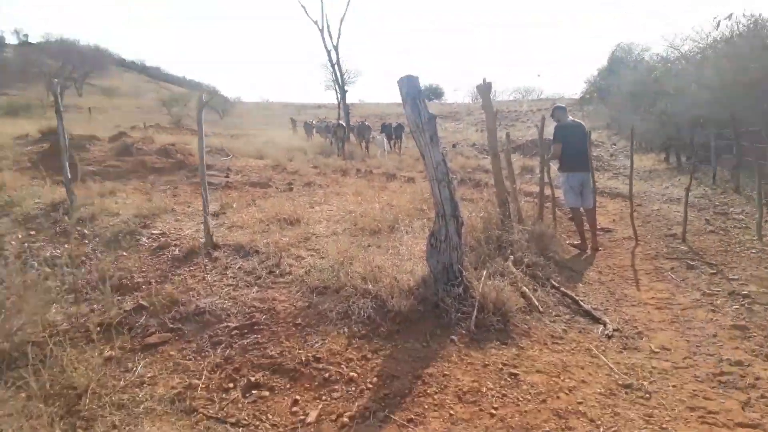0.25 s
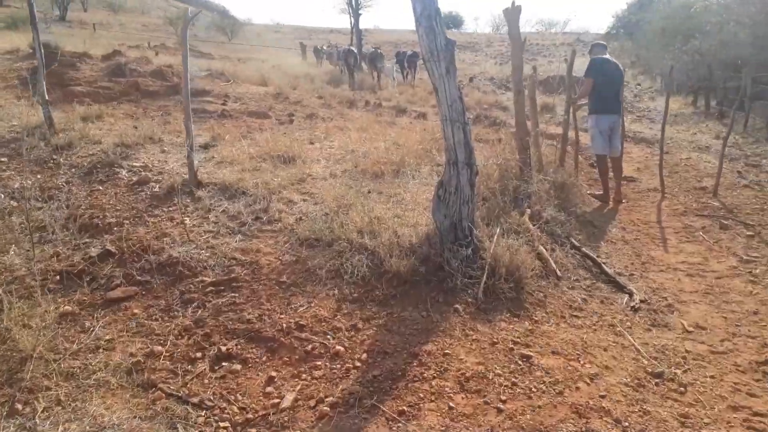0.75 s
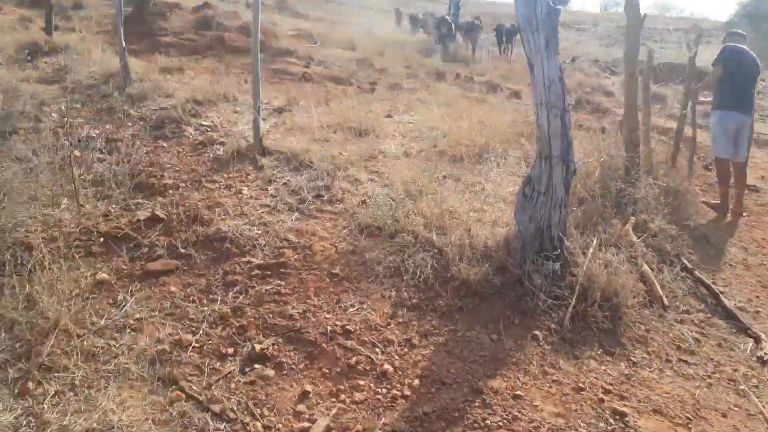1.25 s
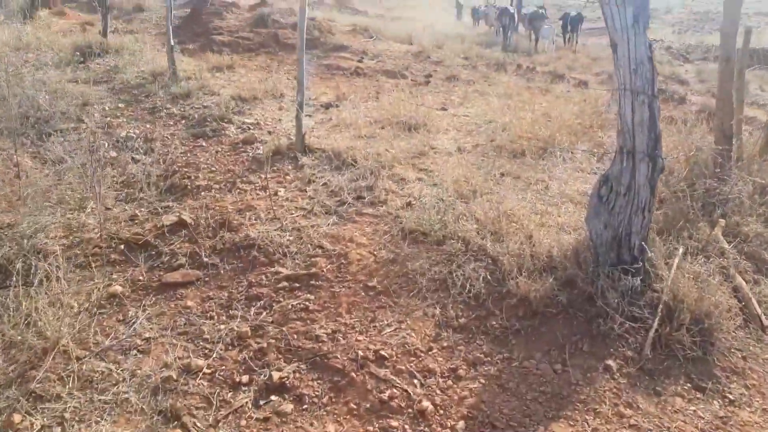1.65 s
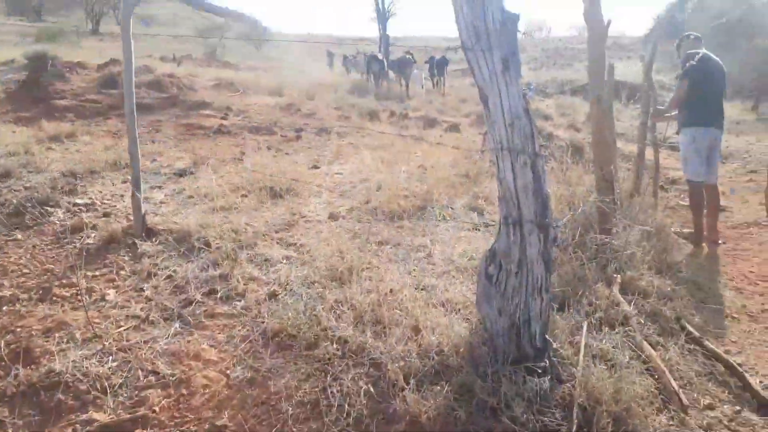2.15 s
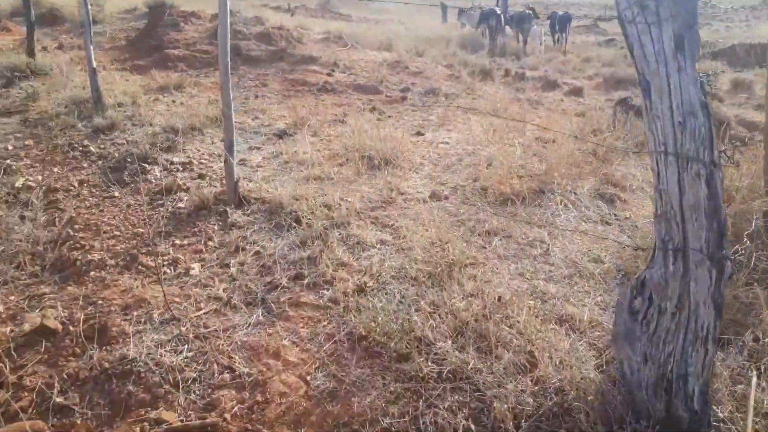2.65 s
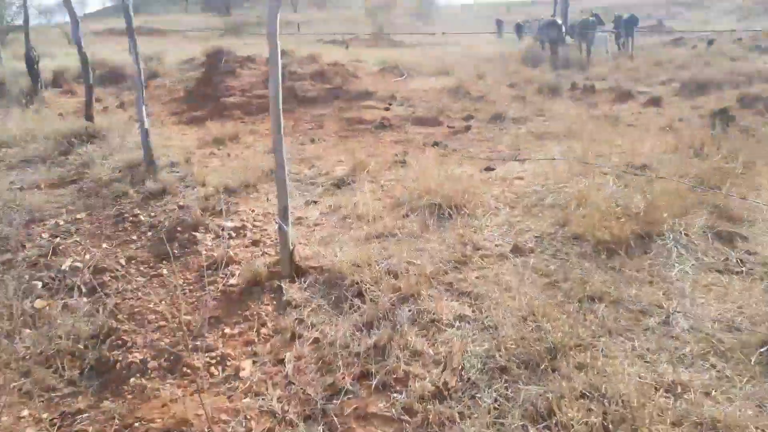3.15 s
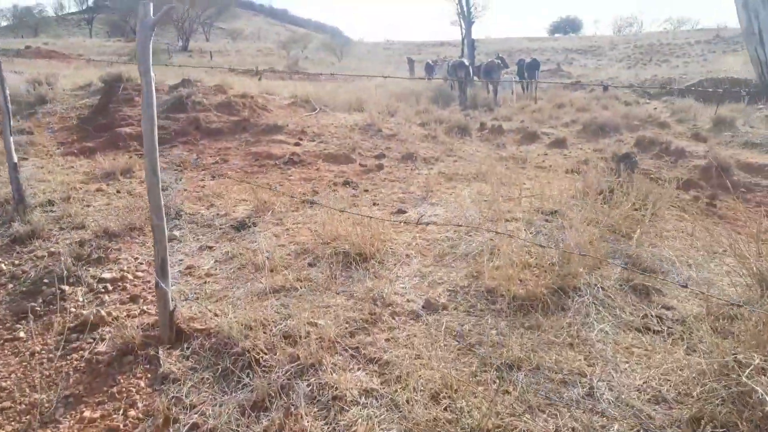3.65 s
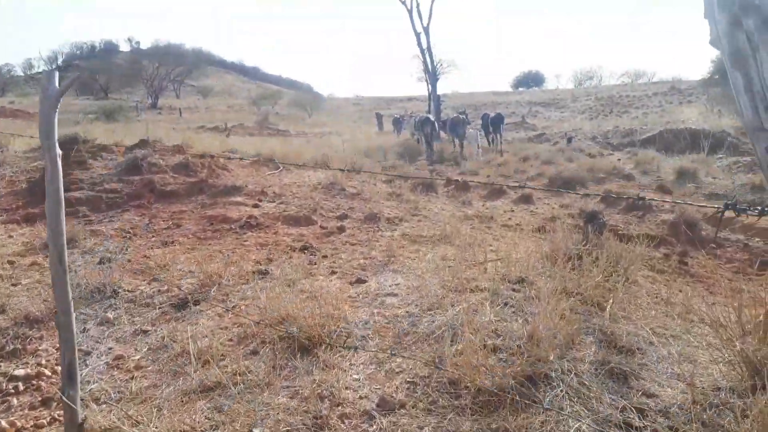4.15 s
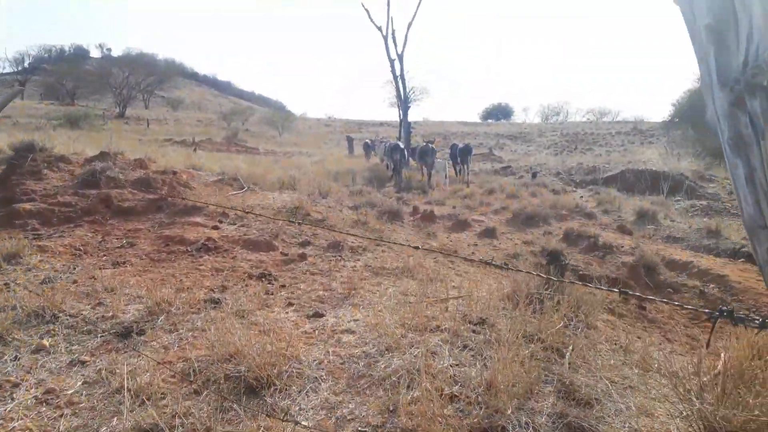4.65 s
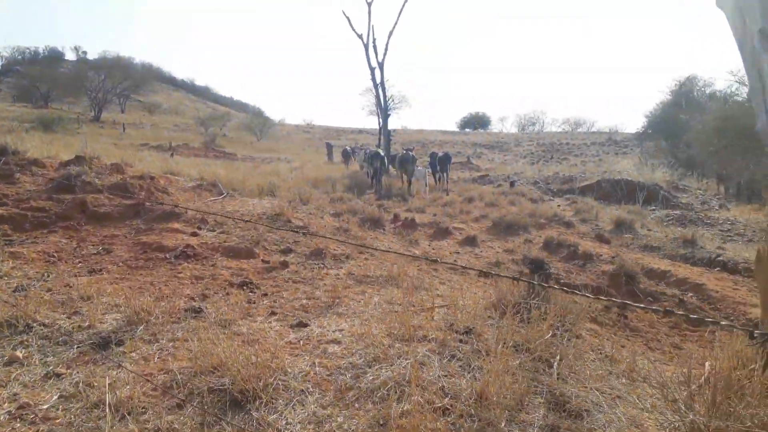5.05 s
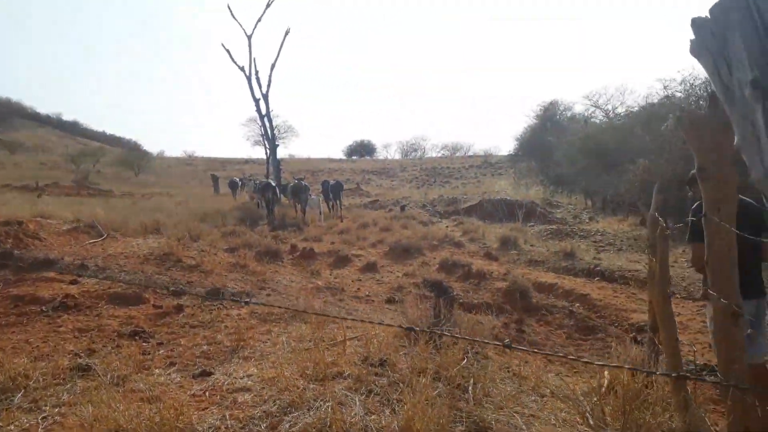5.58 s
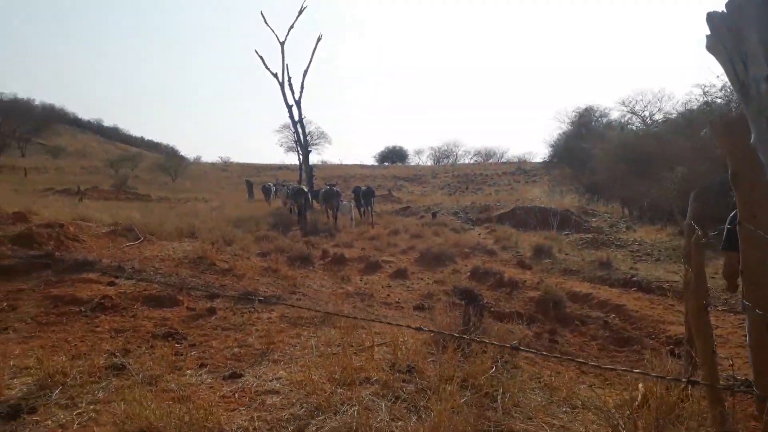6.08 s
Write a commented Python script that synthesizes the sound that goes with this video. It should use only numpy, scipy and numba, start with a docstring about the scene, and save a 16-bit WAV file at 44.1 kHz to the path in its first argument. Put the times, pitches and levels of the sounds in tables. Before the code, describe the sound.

The scene is open, dry pasture with still air and hardly any echo. At about 0.3 seconds a nearby cow briefly draws air, along with a swish of grass and a sharp snap. Stalks crackle, steps grind grit, and small stones knock between roughly 1.5 and 2.2 seconds. At 1.6 seconds the cow starts one long moo as a low pulsing hum. It breaks into a growl around 2.5 seconds, then rises to a hoarse, rattling bellow, loudest near 3.5 seconds. It sinks to a grumble after 4.3 seconds and ends by 4.9. A small bird chirps faintly at about 1.5 and 4.7 seconds. Soft low bumps shake the hand-held microphone, mostly in the first three seconds and again near the end. Faint rustles and ticks continue until about 6.4 seconds.

```python
"""A cow close by draws air and gives one long moo: a pulsing hum that breaks into a growl, swells to a
hoarse open-mouthed bellow and sinks to a grumble. Its vocal folds ring the throat and the changing mouth.
Dry pasture grass rustles and snaps, grit and stones grind and knock underfoot, a small bird chirps twice
and soft bumps shake the hand-held microphone. Open ground, hardly any echo."""
import sys
import numpy as np
from scipy import signal
from scipy.fft import rfft, irfft
from scipy.io import wavfile
from scipy.ndimage import uniform_filter1d
from numba import njit

SR = 44100
rng = np.random.default_rng(int(sys.argv[2]) if len(sys.argv) > 2 else 0)


def persist_wave(psi):
    """Save psi, clipped to +-1, as 16-bit WAV."""
    counts = np.round(np.clip(psi, -1, 1) * 32767).astype(np.int16)
    wavfile.write(sys.argv[1], SR, np.atleast_2d(counts).T)


N = 278712
TIME = np.arange(N) / SR
BINS_HZ = np.maximum(np.fft.rfftfreq(8192, 1 / SR), 1)

# Spectrum of dry straw. Each row: frequency in Hz, gain in dB.
STRAW = [(300,14),(1000,5.5),(2500,8.5),(4000,7),(6000,5),(7500,1.5),(9300,5),(10700,-8),(15500,-2.5)]
# Stalks and clods breaking. Each row: start in seconds, crack peak in dB, body peak in dB.
SNAPS = [(0.1982,-35.5,-35),(0.3211,-25,-29.5),(0.517,-36.5,-50.5),(0.5927,-37.5,-43),(0.714,-39,-58),(0.881,-37,-34),(0.9966,-37,-41),(1.075,-50,-42),
         (1.1974,-35,-56),(1.2347,-32,-60),(1.356,-47,-46),(1.508,-44,-48),(1.5612,-26,-24.5),(1.955,-39,-35),(1.971,-45,-36),(2.1826,-52,-51),(2.7791,-40,-22.5),(2.872,-37.5,-49),(3.165,-35,-43),
         (3.226,-34.5,-35),(3.618,-31.5,-52),(4.2816,-33.5,-55),(4.964,-44,-43.5),(5.149,-35.5,-66),(5.264,-75,-43.5),(5.338,-42,-51),
         (5.421,-41,-67),(5.5217,-46,-54),(5.557,-42,-42),(5.6257,-51,-50),(5.7448,-39.5,-61),(5.7818,-32.5,-48),(6.16,-41.5,-47),(6.283,-43,-36)]


def undb(db):
    """Decibels to gain."""
    return 10 ** (np.asarray(db) / 20)


def curve(rows):
    """Linear interpolation of (seconds, value) rows over TIME."""
    return np.interp(TIME, *np.transpose(rows))


def swell(rows, fade_s=0.011):
    """Gain from (seconds, dB) rows, faded to zero outside their span."""
    inside_s = np.minimum(TIME - rows[0][0], rows[-1][0] - TIME)
    return undb(curve(rows)) * np.clip(1 + inside_s / fade_s, 0, 1)


def unit(x):
    """Scale to rms 1."""
    return x / np.sqrt(np.mean(x ** 2))


def at_peak(x, db):
    """Scale to a peak level."""
    return undb(db) * x / np.abs(x).max()


def steady(x, size=4000):
    """Hold the running rms at 1, keeping the fast flutter."""
    power = uniform_filter1d(uniform_filter1d(x ** 2, size), size)
    return x / np.sqrt(np.abs(power) + 1e-14)


def shape(x, gain):
    """Minimum-phase filter with the given gain on BINS_HZ."""
    cepstrum = irfft(np.log(gain + 1e-6))
    half = len(cepstrum) // 2
    cepstrum[1:half] *= 2
    cepstrum[half + 1:] = 0
    impulse = irfft(np.exp(rfft(cepstrum)))[:half]
    return signal.fftconvolve(x, impulse)[:len(x)]


def colour(x, points):
    """Filter by a spectrum of (Hz, dB) points."""
    hz, db = np.transpose(points)
    return shape(x, undb(np.interp(np.log(BINS_HZ), np.log(hz), db)))


def resonate(x, modes):
    """Filter by steep-sided resonances (centre Hz, width Hz, dB)."""
    power = sum((undb(db) / (1 + (2 * (BINS_HZ - hz) / width) ** 2)) ** 2 for hz, width, db in modes)
    return shape(x, np.sqrt(power))


@njit
def band(x, hz, width_hz):
    """State-variable band-pass with a moving centre."""
    y, band_state, low_state = np.empty(len(x)), 0., 0.
    for i in range(len(x)):
        g, damping = np.tan(np.pi * hz[i] / SR), width_hz / hz[i]
        v = (band_state + g * (x[i] - low_state)) / (1 + g * (g + damping))
        band_state, low_state = 2 * v - band_state, low_state + 2 * g * v
        y[i] = damping * v
    return y


def add(out, start_s, sound):
    """Mix a sound in at start_s."""
    start = max(int(start_s * SR), 0)
    out[start:start + len(sound)] += sound[:max(N - start, 0)]


def grains(per_s, spread_db=2):
    """Sparse clicks, most small and a few large."""
    size = undb(spread_db * np.minimum(rng.exponential(size=N), 4))
    return (rng.random(N) < per_s / SR) * size * rng.standard_normal(N)


def walk(size):
    """Smooth random drift within -1 to 1, changing about every size samples."""
    drift = uniform_filter1d(uniform_filter1d(rng.standard_normal(N), size), size // 2)
    return np.tanh(unit(drift))


def burst(t60_s, size=4096):
    """Exponentially decaying noise."""
    return rng.standard_normal(size) * np.exp(-np.log(1000) * TIME[:size] / t60_s)


def open_air(level_db=-65.5):
    """Faint steady noise of still air."""
    # Each row: frequency in Hz, gain in dB.
    spectrum = [(40,-4),(100,-5),(200,-5),(400,-9.5),(600,-3),(1000,-7.5),(1600,-4),(3000,-15.5),(6000,-21),(9000,-18),(11000,-23),(15500,-18)]
    return undb(level_db) * unit(colour(rng.standard_normal(N), spectrum))


def inhale(top_db=-44.5, release_s=0.31, rise_db_per_s=18, fall_db_per_s=120):
    """Air rushes in through the nostrils, growing a little before it stops."""
    # Each row: resonance in Hz, width in Hz, gain in dB.
    nostrils = [(545,280,3.5),(1080,510,-0.5),(1570,300,10),(2150,660,6),(2830,430,-1),(3950,1300,-3),(6100,2500,-13.5)]
    since_s = TIME - release_s
    db = top_db + np.minimum(rise_db_per_s * since_s, -fall_db_per_s * since_s)
    return undb(db) * unit(resonate(rng.standard_normal(N), nostrils))


def grass(rustle_db=-59.5, settle_db_per_s=2, flick_db=-4, fade_s=0.0043):
    """Dry blades slide in tufts and flick free: a settling rustle, and a swish for each stroke."""
    # Each row: start in seconds, length in seconds, end level in dB, rise in dB, fine-blade share 0-1.
    swishes = [(0.238,0.069,-35.5,18,0.57),(0.718,0.047,-53,-1,0.93),(0.781,0.15,-53,9,0.2),(1.005,0.046,-43.5,13.5,0.9),(1.123,0.13,-55,-5.5,0.67),(1.272,.1,-49.5,4,0.57),(1.393,0.22,-53.5,6,0),(2.032,0.034,-52,0,0),
               (2.184,0.045,-51.5,-12,0),(3.594,0.27,-63.5,-10,0.2),(4.196,0.5,-65,10,0.44),(4.71,0.39,-64.5,3,0.55),(5.502,0.03,-68,-8,0.4),(5.423,0.019,-64,7,1),(5.782,0.021,-56.5,-3,0.64),(5.907,0.083,-68,-4,0.6),(6.08,0.19,-71.5,0,0.3)]
    # Each row: frequency in Hz, gain in dB.
    fine_straw = [(300,-11),(2000,-0.5),(4500,1),(7000,7),(9300,9.5),(10700,3.5),(15500,-9.5)]
    tufts = undb(4 * walk(200) + 4 * walk(900))
    sliding = steady(tufts * grains(per_s=7000), size=3000)
    flicks = unit(np.tanh(grains(per_s=120)))
    blades = sliding + undb(flick_db) * flicks
    coarse, fine = undb(rustle_db - settle_db_per_s * TIME), 0
    for start_s, length_s, end_db, rise_db, fine_share in swishes:
        progress = np.clip((TIME - start_s) / length_s, 0, 1)
        outside_s = np.abs(TIME - start_s - progress * length_s)
        stroke = undb(end_db + rise_db * (progress - 1)) * np.exp(-outside_s / fade_s)
        coarse += (1 - fine_share) * stroke
        fine += fine_share * stroke
    return coarse * unit(colour(blades, STRAW)) + fine * unit(colour(blades, fine_straw))


def crackle(count=130, min_db=-50, range_db=10, low_hz=1400, high_hz=17000, mean_t60_s=0.027):
    """Small stalks tick and soil crumbs drop at random, each with its own pitch and length."""
    out = np.zeros(N)
    for when, pitch, strength, length in rng.random((count, 4)):
        hz = low_hz * (high_hz / low_hz) ** pitch
        tick = resonate(burst(mean_t60_s * (.5 + length), size=2048), [(hz, 0.89 * hz, 0)])
        add(out, when * N / SR, at_peak(tick, min_db + range_db * strength))
    return out


def snaps(crack_t60_s=0.022, body_t60_s=0.037, click=1.22):
    """Each break is a click and a bright crack over a duller, quickly damped body."""
    # Each row: frequency in Hz, gain in dB.
    crack_spectrum = [(1500,-22),(4000,-1.5),(8500,8),(11000,-1),(15000,4.5)]
    body_spectrum = [(200,-1),(600,-2),(1350,-2),(2600,-3),(5000,-17.5),(10000,-36)]
    out = np.zeros(N)
    for start_s, crack_db, body_db in SNAPS:
        crack, body = burst(crack_t60_s), burst(body_t60_s)
        crack[0] = body[0] = click
        add(out, start_s, at_peak(colour(crack, crack_spectrum), crack_db))
        add(out, start_s, at_peak(colour(body, body_spectrum), body_db))
    return out


def snap_haze(relative_db=-37, spread_s=0.043):
    """A faint grainy haze of noise around each snap."""
    impulses = np.zeros(N)
    for start_s, crack_db, _ in SNAPS:
        add(impulses, start_s, undb([crack_db + relative_db]))
    window = np.exp(-np.abs(np.arange(-4096, 4097)) / (spread_s * SR))
    haze = np.tanh(grains(per_s=1100, spread_db=6))
    return signal.fftconvolve(impulses, window, "same") * unit(colour(haze, STRAW))


def bumps(rise_s=0.0077, sag_per_s=30):
    """A bump sways the microphone for a few low cycles that sink in pitch."""
    # Each row: start in seconds, peak in dB, pitch at the peak in Hz.
    jolts = [(0.357,-37,211),(0.373,-30.5,148),(0.39,-33,111),(0.419,-32.5,125),(0.76,-43.5,89),(0.908,-37.5,96),(1.121,-39,97),(1.151,-38.5,100),(1.206,-35,111),
             (1.288,-42.5,84),(1.315,-41.5,94),(2.044,-38,97),(2.075,-37.5,111),(2.785,-37,119.1),(2.84,-35.5,96),(6.141,-41,83.4),(6.281,-46.5,263),(6.285,-40,106)]
    out, t = np.zeros(N), TIME[:4096]
    envelope = (t / rise_s * np.exp(1 - t / rise_s)) ** 2
    for start_s, peak_db, hz in jolts:
        phase = 2 * np.pi * np.cumsum(hz * np.exp(-sag_per_s * (t - rise_s))) / SR
        add(out, start_s, undb(peak_db) * envelope * np.sin(phase))
    return out


def steps(attack_s=0.00018, straw_db=-12):
    """Hooves and feet grind grit and crush a little straw."""
    # Each row: start in seconds, level in dB, decay time constant in seconds.
    footfalls = [(0.794,-49.5,0.017),(0.876,-45,0.091),(0.965,-51.5,0.021),(1.552,-41,0.028),(1.607,-37,0.025),(2.207,-38,0.046),(2.768,-39,0.025),(3.607,-33.5,0.0059),
                 (4.82,-44,0.024),(5.038,-48,0.04),(5.891,-53.5,0.038),(5.953,-56,0.025)]
    # Each row: frequency in Hz, gain in dB.
    grit = [(80,9),(200,3),(500,9),(900,11),(1500,9.5),(2500,4.5),(4000,1.5),(8000,-13.5)]
    weight = np.zeros(N)
    for start_s, db, decay_s in footfalls:
        add(weight, start_s, undb(db) * np.minimum(TIME / attack_s, 1) * np.exp(-TIME / decay_s))
    soil = steady(colour(grains(per_s=3000), grit))
    straw = steady(colour(grains(per_s=3000), STRAW))
    return weight * (soil + undb(straw_db) * straw)


def knocks(width_hz=250, t60_s=0.029):
    """A loose stone scuffs another underfoot and rings briefly."""
    # Each row: start in seconds, peak in dB, resonance in Hz.
    stones = [(0.796,-51,1740),(1.073,-45.5,2170),(1.441,-48,900),(1.613,-31.5,1150),(1.836,-31,1290),(1.892,-32,1370),(1.955,-50,1140),(2.214,-30.5,1210),(2.231,-35,2620),(5.891,-47.5,2370),(5.957,-45,1440)]
    out = np.zeros(N)
    for start_s, peak_db, hz in stones:
        ring = resonate(burst(t60_s), [(hz, width_hz, 0)])
        add(out, start_s, at_peak(ring, peak_db))
    return out


def bird(arch=0.48, crest=0.76, warble=0.073):
    """Short reedy notes that arch up in pitch."""
    # Each row: start in seconds, length in seconds, top pitch in Hz, level in dB.
    chirps = [(1.466,0.0253,1740,-50),(4.698,0.048,2237,-51)]
    # Each row: harmonic number, gain in dB.
    partials = [(1,-27),(2,3.5),(3,-13),(4,-47),(5,-15)]
    out = np.zeros(N)
    for start_s, length_s, top_hz, db in chirps:
        progress = np.linspace(0, 1, int(length_s * SR))
        flutter = unit(uniform_filter1d(rng.standard_normal(N), size=12))[:len(progress)]
        hz = top_hz * (1 - arch * (progress - crest) ** 2) * (1 + warble * flutter)
        phase = 2 * np.pi * np.cumsum(hz) / SR
        note = sum(undb(gain_db) * np.sin(k * phase) for k, gain_db in partials)
        add(out, start_s, undb(db) * np.sin(np.pi * progress) * note)
    return out


def folds(roughness, jitter=.2, shimmer=5, rasp=6.3):
    """Vocal folds close in even clicks; a hoarse version slaps unevenly and chops turbulent air."""
    # Each row: time in seconds, pitch in Hz.
    pitch = [(1.63,74.8),(1.83,78.67),(2.04,85.9),(2.16,85.2),(2.29,83.16),(2.42,76.23),(2.55,66),(3.05,73.97),(3.25,90.29),(3.65,90.02),(3.87,87.26),(4.15,78.73),(4.27,74.35),(4.45,72.56),(4.88,62.82)]
    hz = curve(pitch)
    cycles = np.cumsum(hz) / SR
    closures = np.searchsorted(cycles, np.arange(1, int(cycles[-1])))
    late, strength = rng.standard_normal((len(closures), 2)).T * roughness[closures]
    jittered = np.clip(closures + jitter * late * SR / hz[closures], 0, N - 1).astype(int)
    even, uneven = np.zeros((2, N))
    even[closures] = 1
    uneven[jittered] = undb(shimmer * strength)
    puffs = signal.lfilter([1], [1, -np.exp(-np.median(hz) / SR)], uneven)  # decay: about one period
    turbulence = steady(puffs * rng.standard_normal(N))
    overtone_tilt = [(100, -4), (260, -4), (600, -2), (1200, 0), (3500, 0)]
    return steady(even), colour(steady(uneven) + rasp * turbulence, overtone_tilt)


def throat(flow, roughness, width_hz=78, chest_db=1.2):
    """The flow rings a deep throat resonance; the chest hums along most while the folds swing evenly."""
    # Each row: time in seconds, resonance in Hz.
    resonance = [(1.62,327),(1.67,318),(1.73,184),(2.2,247),(2.65,246),(3.4,260.5),(4.25,253.2),(4.45,204),(4.6,200),(4.85,190)]
    hz = curve(resonance)
    ring = steady(band(band(flow, hz, width_hz), hz, width_hz))
    chest_modes = [(89.4, 26, -12.5), (160.4, 46, -0.5), (398, 92, -15.5)]
    chest = (1 - roughness) ** 3 * steady(resonate(flow, chest_modes))
    nasal_notch = [(110, -2), (180, 1.5), (290, 1), (355, -11), (420, -5), (600, -6)]
    return steady(colour(ring + undb(chest_db) * chest, nasal_notch), size=2000)


def jaw_glide(x, modes):
    """Resonances slide together with the jaw, by filtering on a warped clock."""
    # Each row: time in seconds, frequency ratio.
    jaw = [(1.65,1.0),(2.3,1.0),(2.5,.985),(2.75,1.0),(3.05,1.015),(3.4,1.005),(3.8,.99),(4.08,1.025),(4.3,.965),(4.5,1.0),(4.85,.97)]
    clock = np.cumsum(curve(jaw))
    ticks = np.arange(int(clock[-1]))
    warped = np.interp(ticks, clock, x)
    return np.interp(clock, ticks, resonate(warped, modes))


def mouth(source, shares, wheeze_db=-28.5, drift_db=3.6, breath=.7):
    """The folds ring one mouth shape per stage; folds and breath ring the airway's top resonances."""
    # Each row: resonance in Hz, width in Hz, gain in dB.
    nasal = [(660,220,-4.5),(830,150,-6.5),(1040,170,.5),(1440,150,4),(1920,210,2),(2300,220,-9),(2560,140,-10),(2790,130,-8),(3450,150,-8),(3750,260,-12),(4220,200,-10),(7550,350,-22)]
    hum = [(470,100,-3),(620,150,1),(860,105,5.5),(1110,170,1),(1430,200,-2),(1860,270,2),(2270,200,-1.5),(2660,380,-12),(3600,520,-8.5),(4250,480,-15),(6400,1200,-24)]
    sinking = [(540,190,4),(865,170,7.5),(1140,250,-5),(1460,320,-2.5),(1900,260,-2),(2170,240,-1.5),(2570,500,-14.5),(3750,800,-17),(4450,250,-15)]
    growl = [(520,220,8),(730,170,16),(1040,160,8.5),(1270,140,11.5),(1480,200,9.5),(1880,360,6),(2400,900,-5.5),(4100,2400,-7.5)]
    bellow = [(620,170,2),(985,140,-.5),(1110,160,-6),(1540,110,1.5),(1800,140,-5.5),(2010,200,-10),(2270,120,-7.5),(2730,240,-20),(3700,1600,-32)]
    closing = [(420,80,-1),(595,150,11),(900,130,-1.5),(1110,190,-2),(1450,260,-12),(1850,250,-1.5),(2290,200,-17.5),(2800,420,-22)]
    grumble = [(563,216,5),(850,93,0.5),(1160,490,-5),(1540,430,-4),(1800,270,-5.5),(2210,170,-2.5),(2670,720,-13),(4500,4400,-25)]
    airway = [(3400,200,-3),(3900,200,0),(4450,420,1),(5900,420,-3),(6450,300,-3),(7100,300,-2),(7700,450,-7)]
    shapes = [nasal, hum, sinking, growl, bellow, closing, grumble]
    voice = sum(share * steady(jaw_glide(source, modes)) for share, modes in zip(shares, shapes))
    wheeze_gain = undb(wheeze_db + drift_db * walk(2500))
    wheeze = steady(jaw_glide(source + breath * rng.standard_normal(N), airway))
    return voice + wheeze_gain * wheeze


def moo(voiced_hz=790):
    """The lungs drive the folds through throat and mouth, each stage gliding into the next."""
    # One stage per mouth shape. Each row: entry in seconds, glide in seconds,
    # mouth roughness 0-1, throat roughness 0-1.
    stages = [(1.6,.1,.08,.05),(1.85,.16,.11,.05),(2.26,.16,.16,.07),(2.47,.16,.45,.33),(2.99,.36,.44,.3),(3.8,.3,.22,.09),(4.33,.08,.42,.3)]
    # Lung push (throat) and mouth opening. Each row: time in seconds, level in dB.
    effort = [(1.62,-46.5),(1.7,-45),(1.83,-45.5),(2.2,-35.5),(2.85,-36.5),(3.45,-25),(3.8,-30.5),(4.15,-33),(4.57,-31.5),(4.62,-41),(4.74,-40),(4.9,-63.5)]
    opening = [(1.66,-51.5),(1.72,-44),(1.86,-38.5),(2.1,-41.5),(2.8,-44),(3.0,-37.5),(3.5,-34.5),(4.22,-35.2),(4.36,-45),(4.65,-50.5),(4.9,-60)]
    # Heaves and catches of breath. Each row: centre and half length in seconds, throat and mouth in dB.
    heaves = [(3.136,0.024,7,1.5),(3.176,0.026,-2,-2),(3.445,0.095,0.5,-0.5),(4.258,0.069,5.5,0.5),(4.37,0.038,-5.5,-3)]
    entered = [np.clip(.5 + (TIME - entry_s) / glide_s, 0, 1) for entry_s, glide_s, *_ in stages[1:]]
    shares = -np.diff([np.ones(N), *entered, np.zeros(N)], axis=0)
    mouth_rough, throat_rough = np.array(stages)[:, 2:].T @ shares
    even, hoarse = folds(mouth_rough)
    source = (1 - mouth_rough) * even + mouth_rough * hoarse
    flow = (1 - throat_rough) * even + throat_rough * hoarse
    # below voiced_hz the overtones swing as evenly as the throat
    source += signal.sosfiltfilt(signal.butter(2, voiced_hz, fs=SR, output="sos"), flow - source)
    throat_db, mouth_db = sum(np.outer(db, np.exp(-((TIME - centre_s) / half_s) ** 2))
                              for centre_s, half_s, *db in heaves)
    low = undb(throat_db) * swell(effort) * throat(flow, mouth_rough)
    high = undb(mouth_db) * swell(opening) * mouth(source, shares)
    return low + high


def fold_slaps(per_s=58, fade_db_per_s=76, puff_t60_s=0.031):
    """The folds catch and slap hard, once or in a weakening rattle; each puff rings the mouth."""
    # Each row: start in seconds, length in seconds, first peak in dB.
    runs = [(3.092,.01,-22),(3.184,.01,-22),(3.248,.01,-24),(3.283,.01,-22),(3.373,.01,-22.5),(3.446,.01,-21.5),(3.492,.01,-24.5),(3.514,.01,-20.5),(3.663,.01,-25),(3.704,.01,-31),(4.467,.03,-30.5),(4.498,.03,-29)]
    # Each row: resonance in Hz, width in Hz, gain in dB.
    mouth_modes = [(607.4,129,2),(1040,351,-1),(1567,250,-5),(1850,520,-10.5),(2250,110,-15)]
    out = np.zeros(N)
    for start_s, length_s, peak_db in runs:
        for since_s in np.arange(0, length_s, 1 / per_s):
            ring = resonate(burst(puff_t60_s, size=2048), mouth_modes)
            add(out, start_s + since_s, at_peak(ring, peak_db - fade_db_per_s * since_s))
    return out


def scatter(x, t60_s=.06):
    """Stony ground and fence posts slightly smear the upper part of each pulse."""
    tail = burst(t60_s)
    echoes = signal.fftconvolve(x, tail / np.linalg.norm(tail))[:N]
    return x + colour(echoes, [(250, -20), (700, -10), (2000, -8)])


def scene():
    """Cow, ground, bird and bumps over still air, in mono."""
    air = open_air()
    ground = grass() + steps() + knocks() + snaps() + snap_haze() + crackle()
    cow = scatter(moo() + fold_slaps()) + inhale()
    return (cow + ground + bird() + bumps() + air)[None]


def record(dry):
    """Cut the deepest bass and the top; add a slight DC offset."""
    low_hz, top_hz, offset = 45, 15800, -.0006
    thinned = signal.sosfilt(signal.butter(2, low_hz, "high", fs=SR, output="sos"), dry) + offset
    return signal.sosfilt(signal.ellip(10, .2, 80, top_hz, fs=SR, output="sos"), thinned)


dry = scene()
out = record(dry)
persist_wave(out)
```